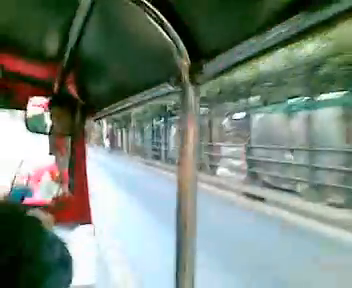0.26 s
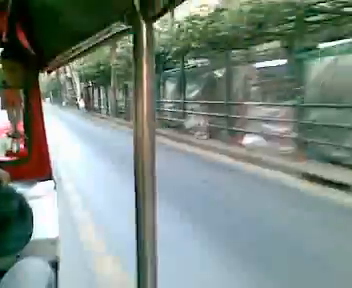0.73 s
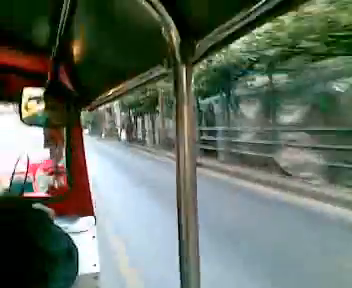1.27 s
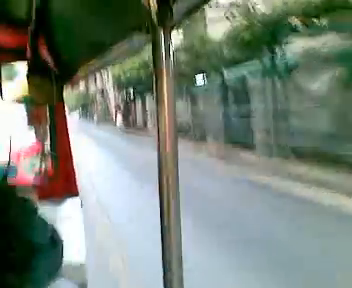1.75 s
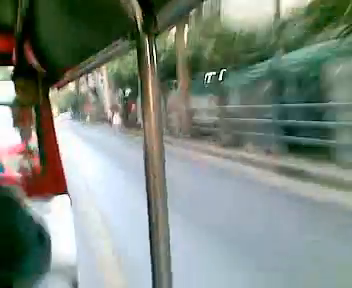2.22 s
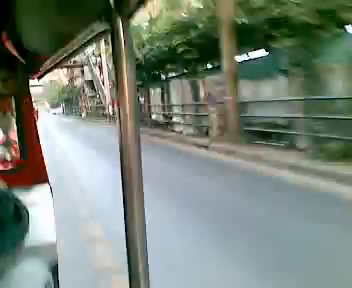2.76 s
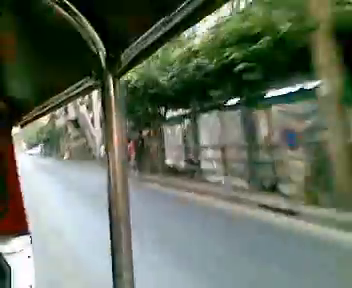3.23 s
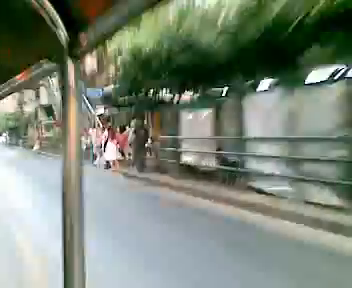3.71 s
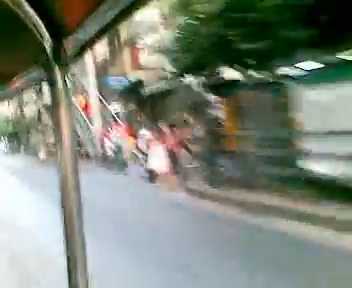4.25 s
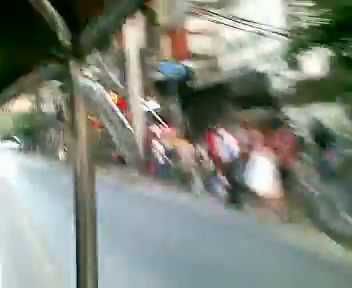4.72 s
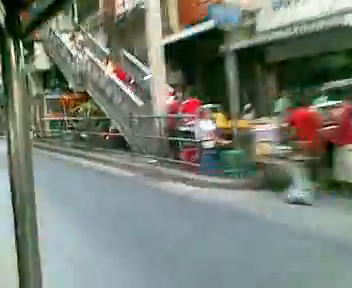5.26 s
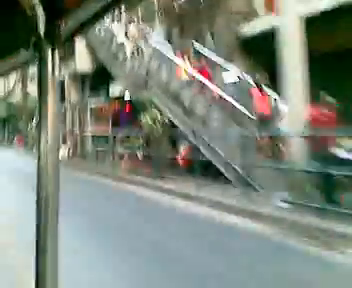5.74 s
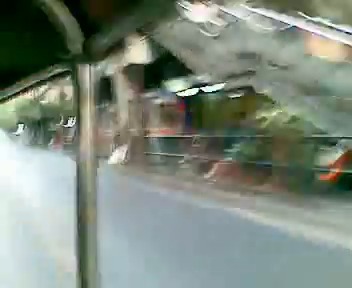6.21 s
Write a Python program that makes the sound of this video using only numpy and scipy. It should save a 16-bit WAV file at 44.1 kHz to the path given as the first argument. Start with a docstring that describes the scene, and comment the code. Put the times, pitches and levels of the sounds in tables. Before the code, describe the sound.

A small two-stroke three-wheeler drones and buzzes along a city street, heard from its open back seat. A horn blares at the start, then the engine climbs in pitch and two quick toots come as it shifts gear. A motorbike draws alongside, chirping and rattling, and drops away while the engine pulls on from low revs. Wind buffets the microphone over tyre noise, and road dips thump the frame.

```python
"""Two-stroke three-wheeler from its open back seat: revs up, shifts at 3 s, pulls on from low revs.
Uneven firings boom in the exhaust and ring the thin body; road dips thump the frame.
A motorbike draws alongside, rattling and chirping at each firing, then drops away.
Wind buffets the microphone over tyre and street noise; two other vehicles sound diaphragm horns."""
import sys
import numpy as np
from scipy import signal
from scipy.fft import rfft, irfft
from scipy.io import wavfile
from scipy.ndimage import uniform_filter1d

SR = 44100
rng = np.random.default_rng(int(sys.argv[2]) if len(sys.argv) > 2 else 0)


def unload_audio(sound):
    """Save the sound as a 16-bit wav file, at the path given as the first command line argument."""
    columns = np.transpose(np.atleast_2d(sound))
    # keep every value between -1 and 1, then stretch to whole-number steps
    steps = np.round(np.clip(columns, -1, 1) * 32767)
    wavfile.write(sys.argv[1], SR, steps.astype(np.int16))


N = 285768
TIME = np.arange(N) / SR

# noise spectra (frequency [Hz], gain [dB])
WIND_SPECTRUM = [(20, -8.5), (35, -1.5), (70, 1.5), (110, 2), (170, 0.5), (250, -11), (400, -37.5),
                 (800, -27)]
ROAD_SPECTRUM = [(150, 6), (300, 8.5), (500, 4), (750, 1), (950, 1), (1150, -2.5), (1400, -1), (1800, -4),
                 (2200, -8.5), (3200, -17), (5000, -15.5)]
HISS_SPECTRUM = [(1500, -28), (2400, 1.5), (3200, 2), (4200, -3.5), (4900, -8.5), (5500, -6.5), (6200, -11),
                 (7300, -13.5)]
# wind gusts (time [s], half length [s], rise [dB])
GUSTS = [(0.5, 0.21, 3.5), (1.612, 0.13, 3), (2.615, 0.73, 3.5), (3.863, 0.55, 7.5), (4.649, 0.11, 10),
         (5.355, 0.2, 5), (6.048, 0.26, 9), (6.421, 0.084, 14.5)]
# horn blasts (start [s], end [s], pitch [Hz], tone name, level [dB], relative rasp [dB])
HORN_BLASTS = [(0, .62, 357.3, "long", -42.5, -10), (2.695, 2.765, 413, "short", -42.5, -20),
               (2.935, 3.015, 414, "short", -41, -20)]
# horn spectra by tone name (frequency [Hz], gain [dB])
HORN_TONES = {"long": [(2140, -32), (2500, -20), (2858, -5.5), (3215, 0), (3572, -3.5), (3930, -13),
              (4700, -36), (6430, -30), (7150, -35)], "short": [(1650, -20), (2065, -16), (2480, 0),
              (2890, -10), (3300, -26), (3715, -15), (4545, -22), (5370, -14), (5780, -25), (6195, -20),
              (6605, -27)]}
# metal squeak (time [s], half length [s], pitch [Hz], level [dB])
SQUEAK = (4.4, 0.18, 1335, -49)

# motorbike revs up, then throttles off (time [s], firing rate [Hz], load [dB])
BIKE_REVS = [(3.3, 44.67, -10), (3.6, 49.4, -17), (4.02, 59.84, -11), (4.25, 72.66, -12.5),
             (4.45, 77.8, -11.5), (4.68, 85.68, -12), (4.8, 88.94, -1.5), (4.9, 93.18, -0.5),
             (5.0, 96.47, -4.5), (5.15, 100.9, -1), (5.35, 105.5, 0.5), (5.47, 97.1, -9.5),
             (5.65, 92.24, -6), (5.85, 84, -6.5), (6.48, 78.57, -4)]
# motorbike exhaust response (frequency [Hz], gain [dB])
BIKE_PIPE = [(50, 4), (92, 10.5), (106, 6), (140, -12), (182, 0), (215, -9), (245, -10), (276, 1.5),
             (310, -6), (335, -12), (357, -3), (395, -19), (455, -7), (492, 0), (525, -18), (590, -19),
             (615, -12), (648, -9), (700, -17), (800, -21)]
# motorbike's rattling metal (frequency [Hz], width [Hz], gain [dB])
BIKE_TIN_MODES = [(1120, 90, -8.5), (1140, 180, 5), (1350, 87, 1.5), (1660, 170, -14.5)]
# motorbike's hardest knocks (time [s], peak [dB], pitch [Hz])
BIKE_KNOCKS = [(4.766, -24, 1162), (4.788, -27, 995), (4.821, -24.5, 1320), (4.853, -24.5, 1340),
               (4.864, -38, 1390), (4.896, -35, 1060), (4.941, -31, 1218), (4.982, -26, 1030),
               (5.042, -30, 1135), (5.103, -28, 1100), (5.191, -28, 1181), (5.25, -31.5, 1200),
               (5.324, -31, 1242)]
# motorbike exhaust chirp, sinking in pitch (time [s], centre [Hz], level [dB])
CHIRP_TRACK = [(3.5, 4250, -65), (3.62, 4100, -50.5), (3.72, 3982, -57.5), (3.93, 3622, -52),
               (4.05, 3424, -41), (4.16, 2935, -44), (4.24, 2876, -41.5), (4.36, 2750, -44),
               (4.48, 2860, -47.5), (4.6, 2784, -43.5), (4.8, 2805, -52.5), (4.95, 2786, -71)]
# chirp sidebands (offset [Hz], gain [dB])
CHIRP_SPREAD = [(20, 0), (120, -2), (280, -12), (750, -19), (1500, -22)]

# road jolts (time [s], relative force [dB])
JOLTS = [(2.518, 8), (3.765, 8), (4.095, 7), (6.398, -19), (6.405, 16.5), (6.408, 17.5), (6.412, 14),
         (6.419, 6), (6.431, 12.5)]
# frame resonances (frequency [Hz], width [Hz], gain [dB])
FRAME_MODES = [(46, 5, 25.5), (134, 62, -19), (297, 100, 10.5), (487.6, 150, -7.5), (819.5, 223, -38)]
# three-wheeler's engine speed (time [s], crank rate [Hz])
CRANK_RATE = [(0, 50.03), (.2, 50.1), (.48, 49.9), (.7, 52.38), (.92, 50.34), (1.07, 50.56), (1.2, 53.13),
              (1.87, 55.72), (1.96, 56.74), (2.28, 59.2), (2.87, 63.83), (3.45, 56.46), (3.87, 50.06),
              (4.0, 48.44), (4.15, 45.6), (4.42, 40.4), (4.65, 41.12), (4.95, 42.74), (5.5, 42.73),
              (6.48, 45.6)]
# engine load, 0 = wide open (time [s], load [dB])
ENGINE_LOAD = [(0, -4.5), (.52, -2.5), (.6, -1), (.7, -0.5), (.8, -9), (.96, -8), (1.1, -3.5), (1.85, -3.5),
               (1.95, -1), (2.82, -0.5), (2.93, -11), (3.7, -13), (3.9, -2), (4.13, -1.5), (4.24, -2),
               (5.12, -2), (5.45, -15), (5.63, -7.5), (5.82, -4), (6.03, -1), (6.48, -1)]
# full-load voice (crank rate [Hz], boom [dB], octave [dB], lope [dB], body ring [dB])
ENGINE_VOICE = [(41.8, -32, -29, -32, -39.5), (41.9, -34.5, -30.5, -32.5, -37),
                (44.65, -30, -33.5, -34, -45), (49.2, -31, -30, -35.5, -49.5),
                (52.3, -27.5, -28.5, -39, -39.5), (56.84, -28.5, -38, -31, -35), (60.8, -27, -38, -28, -35)]
# silencer transmission (frequency [Hz], gain [dB])
SILENCER = [(120, 3), (150, -1.5), (185, 1), (212, 1), (240, -12.5), (320, -16), (390, -15.5)]
# silencer resonances on overrun (frequency [Hz], width [Hz], gain [dB])
CHUG_MODES = [(95, 40, -2), (170, 45, 2)]
# body and tailpipe response (frequency [Hz], gain [dB])
BODY_RESPONSE = [(300, -3.5), (335, 7), (370, -31), (398, 8), (425, 10), (460, 3), (485, 5.5), (540, -16.5),
                 (580, -8), (625, 3), (665, -16.5), (850, -35), (935, -6.5), (1100, -26)]
# panel resonances stirred by gas puffs (frequency [Hz], width [Hz], gain [dB])
PANEL_MODES = [(486, 35, -5), (613, 42, 0), (900, 54, -7)]
# loose panel's envelope (time [s], gain [linear])
SING_ENVELOPE = [(0, 0.74), (.54, 0.77), (.6, 1.6), (.7, 1.5), (.78, 0.35), (.9, 0.15), (.95, 0.64),
                 (1.09, 1.3), (1.15, 0.075), (1.5, 0)]


def undb(db):
    """Decibels to gain."""
    return 10 ** (np.asarray(db) / 20)


def unit(x):
    """Scale to rms 1."""
    return x / np.sqrt(np.mean(x ** 2))


def curves(table):
    """Table columns, interpolated over time."""
    s, *columns = np.transpose(table)
    return [np.interp(TIME, s, c) for c in columns]


def response(spectrum, hz):
    """Linear gain of a spectrum at hz."""
    f, db = np.transpose(spectrum)
    return undb(np.interp(np.log(hz + 1), np.log(f), db))


def noise(spectrum):
    """Coloured noise, rolled off past both ends, rms 1."""
    hz = np.arange(N // 2 + 1) * SR / N + 1e-6
    ends = 1 / (1 + (hz / spectrum[-1][0] / 1.2) ** 8) / (1 + (.7 * spectrum[0][0] / hz) ** 4)
    return unit(irfft(rfft(rng.standard_normal(N)) * response(spectrum, hz) * ends, N))


def walk(rate_hz):
    """Smooth random drift, rms 1."""
    k = SR // rate_hz
    steps = np.repeat(rng.standard_normal(N // k + 1), k)
    return unit(uniform_filter1d(uniform_filter1d(steps, k), k)[:N])


def ring(x, modes):
    """Parallel resonators (frequency [Hz], width [Hz], gain [dB])."""
    return sum(undb(db) * signal.lfilter(*signal.iirpeak(hz, hz / width, SR), x)
               for hz, width, db in modes)


def lowpass(x, order, hz):
    """Butterworth low-pass."""
    return signal.sosfilt(signal.butter(order, hz, fs=SR, output="sos"), x)


def firings(turns, scatter_db):
    """One impulse of random size per turn."""
    at = np.flatnonzero(np.diff(np.floor(turns)))
    pulses = np.zeros(N)
    pulses[at] = undb(scatter_db * rng.standard_normal(N)[:len(at)])
    return pulses


def puffs(turns, depth):
    """Gate that opens each turn and decays, rms 1."""
    return unit(np.exp(-depth * (turns % 1)))


def nearness(late_s, abreast_s=4.794, gap_m=2.15, passing_m_s=4.6):
    """Motorbike's 1 / distance gain; 1 at abreast_s + late_s."""
    return gap_m / np.hypot(gap_m, passing_m_s * (TIME - abreast_s - late_s))


def wind(base_db=-40.5):
    """Gusts buffet the microphone."""
    gust_db = sum(db * np.exp(-((TIME - s) / half_s) ** 2) for s, half_s, db in GUSTS)
    return noise(WIND_SPECTRUM) * undb(base_db + gust_db + 2 * walk(14))


def road(turns, hz, load_db, roar_db=-43.5, hiss_db=-53.5, bike_roar_db=-37.5, bike_hiss_db=-48):
    """Roar and hiss pulse with the engine; the motorbike's tyres and chain swell both."""
    wake = nearness(late_s=.36)
    strain = undb(-42 + .59 * load_db) * (hz / hz.max()) ** .97
    roar_gain = np.sqrt(undb(roar_db) ** 2 + strain ** 2 + (undb(bike_roar_db) * wake) ** 2)
    hiss_gain = np.hypot(undb(hiss_db), undb(bike_hiss_db) * wake)
    roar = noise(ROAD_SPECTRUM) * roar_gain * undb(.92 * walk(20)) * puffs(2 * turns, depth=.062)
    hiss = noise(HISS_SPECTRUM) * hiss_gain * undb(.5 * walk(30)) * puffs(turns, depth=.24)
    return roar + hiss


def street_echo(x, t60_s, wet_db):
    """House fronts add a diffuse, duller tail."""
    tail = lowpass(rng.standard_normal(SR), order=2, hz=3800)
    tail *= np.exp(-np.log(1000) * TIME[:SR] / t60_s)
    return x + undb(wet_db) * signal.fftconvolve(x, tail / np.sqrt(np.sum(tail ** 2)))[:N]


def horn(start_s, end_s, hz, name, db, rasp_db, flutter_db=3.3):
    """Hammering diaphragm: harmonics coloured by the tone disc, rasp from uneven blows."""
    tone = HORN_TONES[name]
    angle = 2 * np.pi * np.cumsum(hz * (1 + .001 * walk(40))) / SR
    buzz = np.zeros(N)
    for k in range(4, 21):
        gain = response(tone, k * hz) * undb(flutter_db * walk(45))
        buzz += gain * np.sin(k * angle + k * k + .35 * walk(100))
    gate = np.interp(TIME, [start_s - .004, start_s + .0037, end_s - .01, end_s + .012], [0, 1, 1, 0])
    return (unit(buzz) + undb(rasp_db) * noise(tone)) * undb(db) * gate


def squeak(s, half_s, hz, db):
    """Metal squeak: a wavering tone that swells and dies."""
    tone = np.sqrt(2) * np.sin(2 * np.pi * np.cumsum(hz * (1 + .0391 * walk(300))) / SR)
    return tone * undb(db + 2.3 * walk(60)) * np.exp(-((TIME - s) / half_s) ** 2)


def bike_knocks(rise_s=.0007):
    """The hardest firings clack in the motorbike's tin shield."""
    out = np.zeros(N)
    for s, db, hz in BIKE_KNOCKS:
        age = np.maximum(TIME - s + rise_s, 0) / rise_s
        out += undb(db) * age * np.exp(1 - age) * np.sin(2 * np.pi * hz * (TIME - s))
    return out


def bike_chirps(turns, upper_ratio=1.15, upper_db=-8.5, floor=.28, sharpness=6):
    """One raspy exhaust whistle per firing, a weaker one just above."""
    hz, db = curves(CHIRP_TRACK)
    angle = 2 * np.pi * np.cumsum(hz) / SR
    band = noise(CHIRP_SPREAD) * np.cos(angle)
    band += undb(upper_db) * noise(CHIRP_SPREAD) * np.cos(upper_ratio * angle)
    levelled = unit(np.tanh(.8 * unit(band)))
    gate = unit(floor + np.abs(np.sin(np.pi * turns)) ** sharpness)
    return levelled * gate * undb(db)


def motorbike(pipe_db=-34.5, lope_db=-6, rattle_db=-42, appear_s=3.154, fade_s=.18):
    """Small twin: pipe harmonics, half orders from unequal cylinders, rattle at each firing."""
    hz, load_db = curves(BIKE_REVS)
    near = nearness(late_s=0) * (.5 + .5 * np.tanh((TIME - appear_s) / fade_s))
    turns = np.cumsum(hz) / SR + .004 * walk(60) - .45
    stack = np.zeros(N)
    for k in np.arange(2, 17) / 2:
        gain = response(BIKE_PIPE, k * hz) * undb(lope_db * (k % 1 > 0))
        stack += gain * np.sin(2 * np.pi * k * turns + k * k)
    pipe = np.sqrt(2) * stack * undb(pipe_db + load_db + 1.4 * walk(50))
    grit = puffs(turns, depth=17) * rng.standard_normal(N)
    tin = ring(unit(firings(turns, scatter_db=2)) + grit, BIKE_TIN_MODES)
    rattle = unit(ring(tin, [(1270, 900, 0)])) * undb(rattle_db + .36 * load_db)
    rattle *= nearness(late_s=.2)  # shielded until abreast
    return near * (pipe + rattle) + bike_chirps(turns)


def jolts(peak_db=-13.5):
    """A wheel drops into dips; the frame thumps."""
    force = np.zeros(N)
    for s, db in JOLTS:
        force[int(s * SR)] -= undb(db)
    thump = lowpass(ring(force, FRAME_MODES), order=3, hz=1000)
    return thump / np.abs(thump).max() * undb(peak_db)


def canopy(turns, load_db, strut_hz=926.6, width_hz=46, db=-51.5, shift_s=2.9):
    """A canopy strut buzzes near 930 Hz, louder under load, until the gear change."""
    strut = [(strut_hz, width_hz, 0)]
    force = puffs(turns, depth=4) * rng.standard_normal(N)
    buzz = unit(ring(ring(force, strut), strut))
    low_gear = np.interp(TIME, [shift_s, shift_s + .08], [1, 0])
    return buzz * undb(db + .6 * load_db) * low_gear


def gears(turns, hz, load_db, order=8.73, db=-44, onset_hz=(57, 58.5)):
    """Loaded gears whine at high revs, between engine orders."""
    whine = np.sqrt(2) * np.sin(2 * np.pi * order * turns + .36 * walk(30))
    return whine * undb(db + load_db + 2 * walk(15)) * np.interp(hz, onset_hz, [0, 1])


def loose_panel(turns, load_db, order=9, panel_hz=456, width_hz=14, drive_db=-42.5):
    """A loose panel sings near 456 Hz in the first 1.5 s, swelling twice."""
    drive = np.sqrt(2) * np.sin(2 * np.pi * order * turns) * undb(drive_db - .34 * load_db)
    panel = [(panel_hz, width_hz, 0)]
    return ring(ring(drive, panel), panel) * undb(2.9 * walk(40)) * curves(SING_ENVELOPE)[0]


def overrun(turns, load_db, db=-36.5, below_db=-7.5, range_db=13.5):
    """Throttle shut: uneven firings chug in the silencer."""
    shut = np.clip((below_db - load_db) / range_db, 0, 1)
    pops = firings(turns, scatter_db=4.5)
    chugs = lowpass(ring(pops, CHUG_MODES), order=4, hz=230)
    return unit(chugs) * shut * undb(db)


def body(turns, hz, ring_db, bark_db=3, bark_hz=(56, 54.5)):
    """Upper orders flare in the panel resonances; a gas puff follows each turn."""
    orders = np.arange(6, 20)[:, None]
    tailpipe_db = np.isin(orders, (7, 9, 10)) * np.interp(hz, bark_hz, [0, bark_db])
    gains = response(BODY_RESPONSE, orders * hz) * undb(tailpipe_db)
    gains /= np.sqrt(np.sum(gains ** 2, axis=0))
    lag_rad = (orders * hz / 300) ** 2  # panel delay grows with frequency, smearing each knock
    flicker = undb(1.6 * np.array([walk(40) for _ in orders]))
    lines = np.sqrt(2) * np.sum(gains * flicker * np.cos(2 * np.pi * orders * turns - lag_rad), axis=0)
    gas = unit(ring(puffs(turns, depth=.98) * rng.standard_normal(N), PANEL_MODES))
    return undb(ring_db) * lines + undb(.45 * ring_db - 35) * gas


def exhaust(turns, hz, boom_db, octave_db, lope_db, frame_hz=59):
    """Firings boom at twice crank rate; one stronger cylinder adds orders 3, 5 and 6."""
    angle = 2 * np.pi * (turns + .003 * walk(60))
    boom = undb(boom_db + 1.1 * walk(50)) * np.cos(2 * angle)
    octave = undb(octave_db) * np.cos(4 * angle)
    lope = undb(lope_db) * sum(response(SILENCER, k * hz) * np.cos(k * angle) for k in (3, 5, 6))
    # crank imbalance shakes the frame near resonance, at any load
    shake = undb(-43) * np.cos(angle) / (1 + ((hz - frame_hz) / 4.5) ** 2)
    return np.sqrt(2) * (boom + shake + (octave + lope) * undb(1.9 * walk(70)))


def engine(turns, hz, load_db, boom_knee_db=-5):
    """Two-stroke: speed sets the voice; load opens it up, the boom saturating first."""
    speeds_hz, *voice = np.transpose(ENGINE_VOICE)
    boom_db, octave_db, lope_db, ring_db = (np.interp(hz, speeds_hz, column) for column in voice)
    boom_db += 20 * np.log10(np.tanh(undb(2.33 * (load_db - boom_knee_db))))
    pipe = exhaust(turns, hz, boom_db, octave_db + 3.7 * load_db, lope_db + load_db)
    panels = body(turns, hz, ring_db + 2.02 * load_db)
    return pipe + panels + loose_panel(turns, load_db) + gears(turns, hz, load_db)


def scene():
    """Mono mix at the back seat."""
    (hz,), (load_db,) = curves(CRANK_RATE), curves(ENGINE_LOAD)
    turns = np.cumsum(hz) / SR
    horns = street_echo(sum(horn(*row) for row in HORN_BLASTS), t60_s=1.15, wet_db=-10)
    ride = engine(turns, hz, load_db) + overrun(turns, load_db) + canopy(turns, load_db) + jolts()
    air = wind() + road(turns, hz, load_db)
    return (ride + air + motorbike() + bike_knocks() + squeak(*SQUEAK) + horns)[None]


def record(dry):
    """Soft-clip the peaks, cut the high treble."""
    ceiling, top_hz = .36, 7250
    rounded = ceiling * np.tanh(dry / ceiling)
    return signal.sosfilt(signal.ellip(10, .2, 80, top_hz, fs=SR, output="sos"), rounded)


dry = scene()
out = record(dry)
unload_audio(out)
```